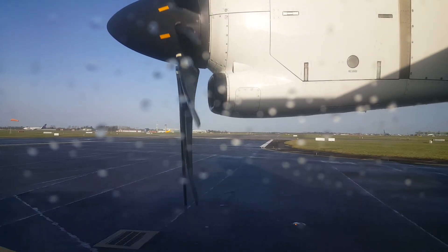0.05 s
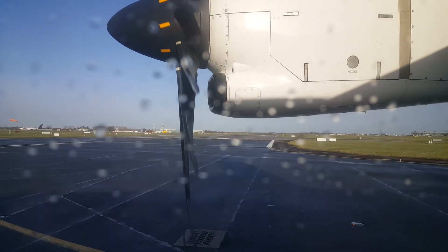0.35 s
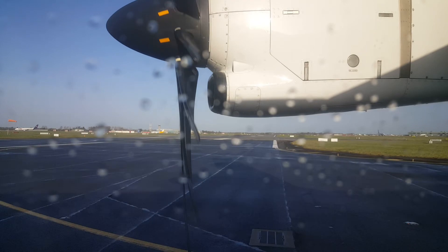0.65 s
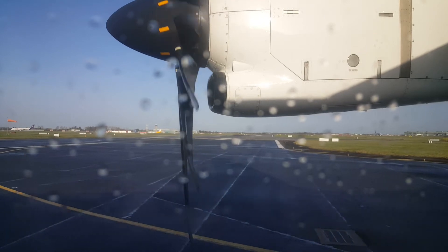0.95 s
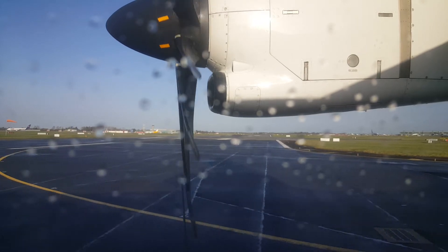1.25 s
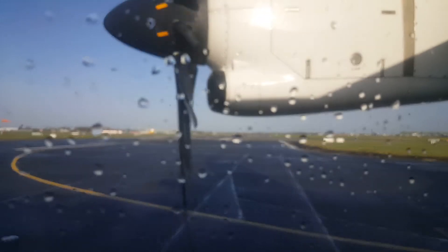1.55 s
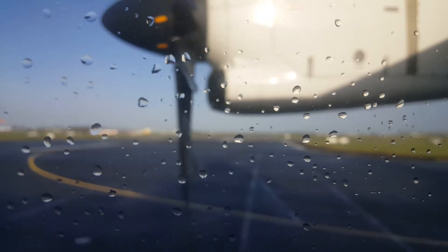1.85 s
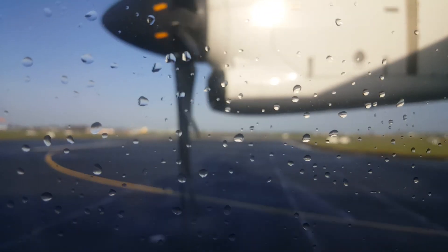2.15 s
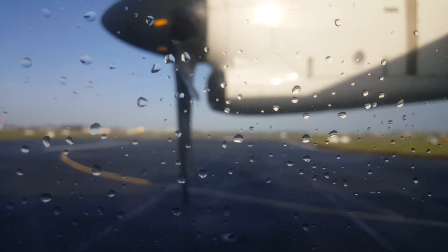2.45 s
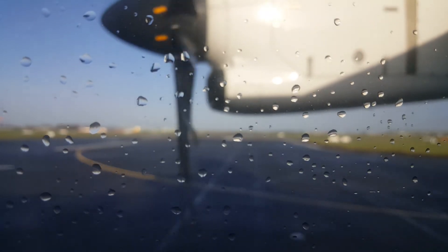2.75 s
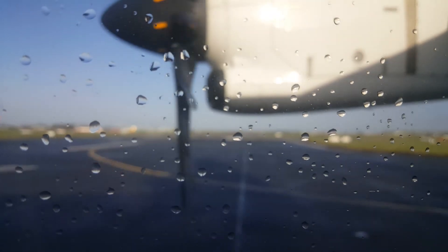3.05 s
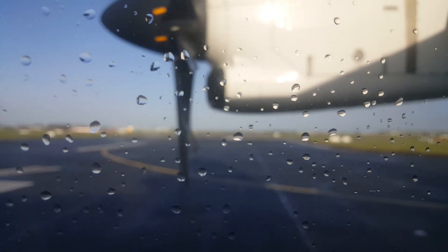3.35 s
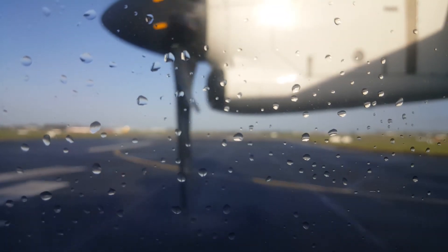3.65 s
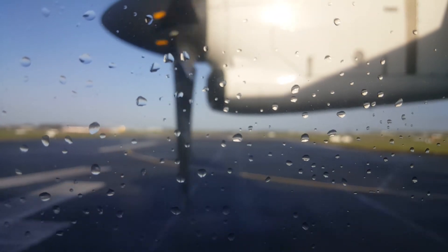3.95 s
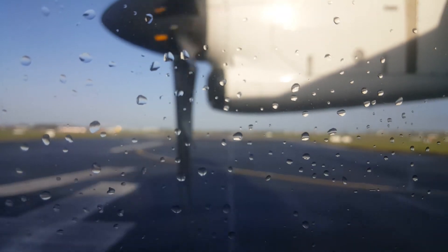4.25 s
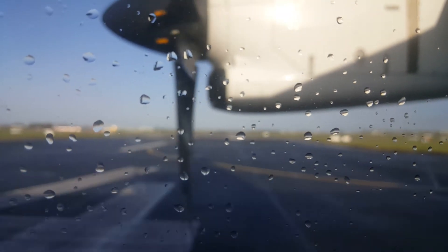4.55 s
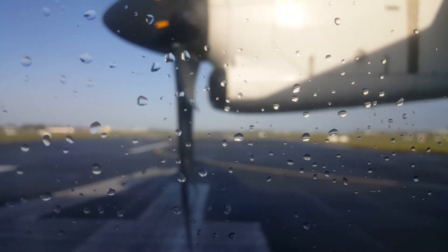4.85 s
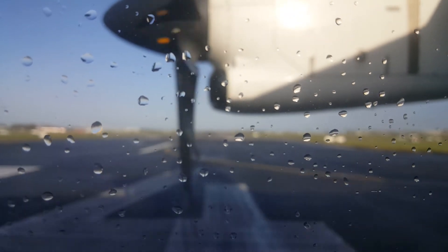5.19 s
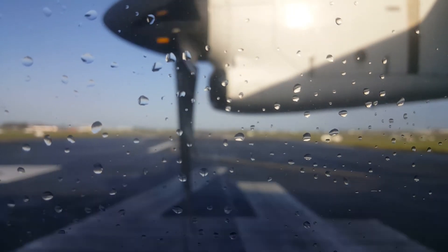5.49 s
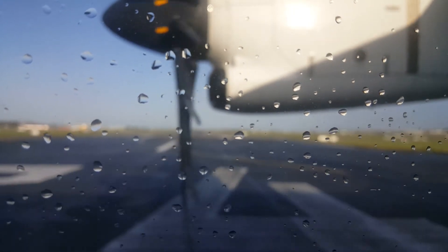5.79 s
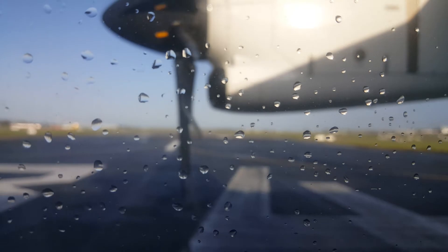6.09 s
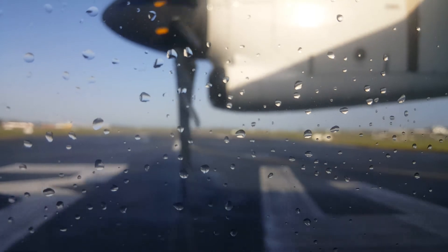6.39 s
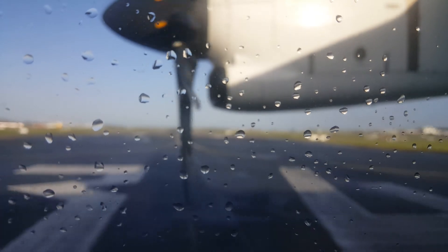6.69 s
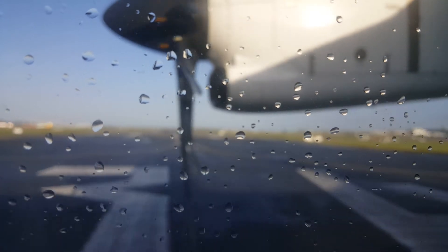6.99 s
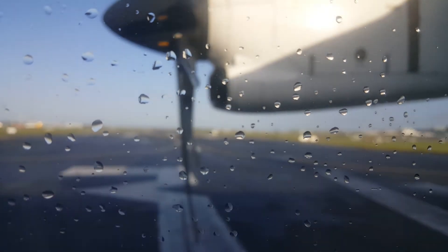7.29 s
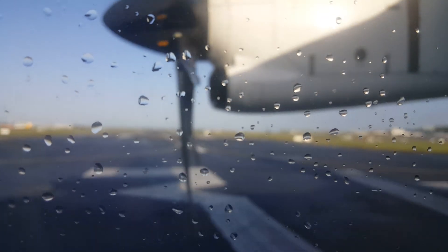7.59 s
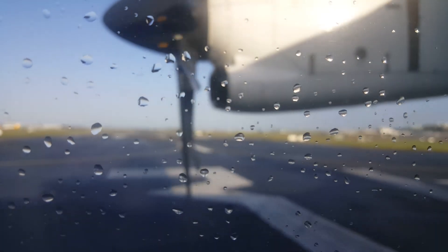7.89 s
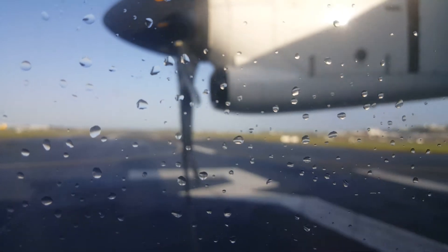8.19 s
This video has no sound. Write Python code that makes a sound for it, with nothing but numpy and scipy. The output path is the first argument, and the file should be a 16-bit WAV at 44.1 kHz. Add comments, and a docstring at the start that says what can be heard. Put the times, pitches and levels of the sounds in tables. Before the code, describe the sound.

A turboprop engine drones inside the cabin, booming over wheel bumps, before the propellers take load and buzz loudly.

```python
"""Inside a turboprop airliner turning onto the runway, heard from a window seat beside the propeller.
From the start, a throbbing engine drone fills the cabin over rumble, propeller wash, air hiss and a
thin turbine whine, while plastic trim panels tick. After four seconds the wheels bump over two pavement
joints, and the drone sags in pitch and booms. At six seconds the blades take load and start to buzz."""
import sys
import numpy as np
from scipy import signal
from scipy.fft import rfft, irfft
from scipy.io import wavfile
from scipy.ndimage import uniform_filter1d, minimum_filter1d

SR = 44100
rng = np.random.default_rng(int(sys.argv[2]) if len(sys.argv) > 2 else 0)


def transcribe(u):
    """Save the signal u as a 16-bit wav file named by the first command-line argument.

    u: samples, shape (n,) or (channels, n), limited to [-1, 1]; the rate is SR.
    q: integer samples, one column per channel.
    """
    v = np.clip(np.atleast_2d(u).T, -1, 1)
    q = np.round(v * 32767).astype(np.int16)
    wavfile.write(sys.argv[1], SR, q)


N = 362943
TIME, FREQ = np.arange(N) / SR, np.fft.rfftfreq(N, 1 / SR)

# Table levels are relative: the functions scale and offset them.
# The drone sags and booms as the aircraft lines up: time_s, pitch_hz, level_db, roughness (0-1)
DRONE_PATH = [(0, 129, -17, 0.7), (1.9, 131, -14.5, .45), (3.3, 129.5, -15.5, .4), (4.15, 128, -16, .45),
              (4.55, 123.5, -8.5, 0.3), (5.05, 122, -7.5, .2), (5.65, 125.5, -8.5, .2),
              (6.15, 131, -8, .22), (6.6, 131.5, -14.5, .45), (7.6, 132.5, -14.5, 0.1),
              (8.23, 129.5, -17, 0.2)]
# Brief swells and dips of the drone: middle_s, lift_db, length_s
DRONE_SWELLS = [(0.396, 2, 0.054), (1.605, 11, 0.11), (2.679, 5.5, 0.31), (3.461, 9, 0.1), (3.92, 7.5, .06),
                (4.128, -9.5, 0.063), (6.701, -7.5, 0.071), (6.837, 5.5, .08), (7.245, -10, 0.073),
                (7.492, 12, 0.044), (7.619, 6, .08)]
# Speed and buzz of the blades: time_s, blade_rate_hz, level_db
BLADE_PATH = [(0, 87, -43.5), (3.6, 81, -42), (5, 87, -47.5), (5.8, 84, -44.5), (6.2, 87, -29),
              (6.45, 84, -26), (6.75, 85, -19.5), (7.1, 87, -20), (7.5, 85.5, -22), (8.23, 85.8, -20)]
# The tones in the buzz: multiple (of the blade rate), near_propeller_db, far_propeller_db
BLADE_TONES = [(1, -13, -21), (2, -10.5, -7.5), (3, 1, -12), (4, -3.5, -13), (5, -8, -7), (6, -11, -15),
               (7, -13, -9.5), (8, -12.5, -13), (9, -17, -13), (10, -13.5, -28.5), (11, -21.5, -26),
               (12, -26, -26.5), (13, -21.5, -30.5), (14, -29.5, -33.5)]
# Colour of the airframe's rumble: frequency_hz, level_db
RUMBLE_COLOUR = [(4, -26.5), (15, -36.5), (27, -25.5), (38, -24.5), (52, -13.5), (70, -11), (100, -11),
                 (130, -5.5), (157, -13), (199, -11), (227, -10), (253, -19), (288, -14.5), (320, -21.5),
                 (380, -19.5), (470, -30.5), (610, -62.5), (1030, -120)]
# The rumble eases while the aircraft lines up: time_s, level_db
RUMBLE_PATH = [(0, -18), (4.8, -18), (5.15, -19.5), (6.7, -17), (8.23, -16.5)]
# Colour of the wash, the air thrown back by the propellers: frequency_hz, level_db
WASH_COLOUR = [(260, -32.5), (450, -3), (532, -5), (581, -2), (626, -5.5), (675, 0), (776, -6), (882, -4.5),
               (985, -5.5), (1210, -10), (1370, -11.5), (1500, -14.5), (1800, -16.5), (2340, -51),
               (3960, -120)]
# The wash eases through the turn and returns with the power: time_s, level_db
WASH_PATH = [(0, -28), (1.6, -30.5), (3.5, -29.5), (5.3, -33), (6.03, -31.5), (6.2, -27.5), (6.7, -24.5),
             (7.4, -26.5), (8.23, -26)]
# Colour of the air hiss: frequency_hz, level_db
HISS_COLOUR = [(1030, -34), (1750, -1), (1900, 0.5), (2550, -3.5), (2920, -9.5), (3770, -15.5),
               (3990, -16.5), (4170, -16), (4330, -18.5), (5010, -23), (7030, -27), (7780, -27.5),
               (10100, -40), (12700, -37.5), (15600, -43)]
# The hiss swells as power comes on: time_s, level_db
HISS_PATH = [(0, -41.5), (4.5, -41.5), (5.2, -43), (6.45, -40), (7.3, -42.5), (8.23, -42.3)]
# Wheels crossing pavement joints: middle_s, level_db, length_s
WHEEL_BUMPS = [(4.094, -27, .22), (4.777, -18.5, 0.2)]
# Ticks of the cabin trim: start_s, peak_db, tilt_db_per_octave, decay_s
TRIM_TICKS = [(1.578, -34, 0.5, .0015), (1.978, -27, -1, .0035), (2.174, -17.5, -5.5, 0.00058),
              (3.083, -28, -1, .002), (3.148, -31, -1, 0.0011), (4.145, -29, 0, .002),
              (4.5187, -33, 3, 0.0032), (4.528, -17, -4.5, 0.0012), (6.197, -29, -1, 0.0027),
              (6.4178, -32, -1, 0.0011), (6.535, -30, -2, 0.0028), (7.1705, -26.5, -5, 0.0015),
              (7.378, -31, -1, 0.0029), (7.4536, -31, 1, 0.0019), (7.944, -32, 1, 0.0029)]
# Colour of a tick: frequency_hz, level_db
TRIM_COLOUR = [(300, -38.5), (1500, -6.5), (2600, 3.5), (4300, 2), (5500, 0), (7000, -5), (8700, -6.5),
               (10200, -19.5), (11300, -15.5), (12800, -9), (15500, -15)]
# The whine fades and rises in the turn, then glides down under power: time_s, pitch_hz, level_db
WHINE_PATH = [(0, 4105, -58), (.9, 4130, -55.5), (2.5, 4143, -64.5), (3.15, 4140, -54.5),
              (3.8, 4135, -56.5), (4.7, 4130, -70), (5.9, 4420, -78), (6.7, 4300, -67), (7.5, 4175, -72),
              (7.73, 4140, -57), (8.23, 4110, -67)]
# Pitches boosted or weakened in the noise: cabin resonances, plus a thin high sheen from the
# microphone: frequency_hz, width_hz, lift_db
NOISE_PEAKS_AND_DIPS = [(55, 8.3, 3), (71.5, 5.7, -6), (84.4, 15, 7), (106, 8.2, -2.5), (176, 33, 4.5),
                        (199, 20, -5), (242, 14, 3.5), (620, 21, 4), (659, 7.1, 3.5), (998, 40, -7),
                        (1204, 14, -8.5), (1794, 150, -4.5), (1980, 120, 2.5), (12900, 400, 5)]
# How much the ears differ (side) against what they share (mid): frequency_hz, side_db
STEREO_WIDTH = [(30, -26.5), (60, -21.5), (110, -16), (200, -18.5), (380, -7.5), (700, -4), (1290, 3),
                (2380, -0.5), (4400, 0), (15000, 0)]
# How much louder the left ear is than the right: frequency_hz, left_db
STEREO_LEAN = [(60, -0.5), (110, 3), (200, 1), (380, -2), (700, 2), (1290, 3.5), (2380, 4), (4400, 4),
               (8120, 2.5), (15000, -4)]


def engine_drone(gain_db=-1.5, spread_hz=11, right_db=0.87, evenness=0.4):
    """One strong engine tone that swells now and then; turbulence shakes its phase and strength."""
    hz, db, rough = curves(DRONE_PATH)
    swell = amp(sum(lift_db * bell_curve(TIME - s, length) for s, lift_db, length in DRONE_SWELLS))
    rough = np.clip(rough / swell, 0, 1)  # steadier while it swells
    shake = (1 - rough + rough * flutter(spread_hz)) / np.hypot(1 - rough, rough)
    shake /= (abs(shake) + 0.053) ** evenness  # partly evens out the strength
    tone = unit((spin(hz) * shake).real) * amp(db + gain_db) * swell
    return np.array([tone, tone * amp(right_db)])


def propellers(rough=.55, smear_hz=7, lag_hz=.7):
    """The passing blades of two propellers buzz slightly out of step; gusts smear their tones."""
    hz, db = curves(BLADE_PATH)
    near, far = spin(hz), spin(hz - lag_hz)
    out = np.zeros((2, N))
    for multiple, near_db, far_db in BLADE_TONES:
        for rotor, tone_db in (near, near_db), (far, far_db):
            steady = (1 - rough) * np.exp(2j * np.pi * rng.random())
            tone = unit(steady + rough * flutter(smear_hz)) * rotor ** multiple
            side = (-1) ** multiple * tone.imag  # a quarter cycle off, so the ears differ in phase
            out += amp(tone_db) * ears(tone.real, side, multiple * hz.mean())
    return unit(out) * amp(db)


def blade_load():
    """How hard the blades work, from 0 to 1."""
    _, db = curves(BLADE_PATH)
    return amp(db - db.max())


def roar(rumble_db=3, wash_db=-1, gust_db=0.93, gust_hz=12, full_load_db=-4):
    """Airframe rumble, gusty wash and hiss; under load some wash gives way to the blade buzz."""
    (rumble_level,), (wash_level,) = curves(RUMBLE_PATH), curves(WASH_PATH)
    (hiss_level,) = curves(HISS_PATH)
    gusts = gust_db * unit(flutter(gust_hz).real)
    rumble = cabin_noise(RUMBLE_COLOUR) * amp(rumble_level + rumble_db)
    wash = cabin_noise(WASH_COLOUR) * amp(wash_level + wash_db + gusts + full_load_db * blade_load())
    hiss = cabin_noise(HISS_COLOUR) * amp(hiss_level + gusts)
    return rumble + wash + hiss


def cabin_noise(colour, ripple_db=1.27):
    """The noise of swirling air, shaped by cabin resonances and the microphone's thin high sheen."""
    lift_db = sum(db / (1 + (2 * (FREQ - hz) / width) ** 2) for hz, width, db in NOISE_PEAKS_AND_DIPS)
    # nearby walls put many small peaks and dips in the treble
    ripple = unit(uniform_filter1d(rng.standard_normal((2, len(FREQ))), size=500, axis=1))
    ripple *= FREQ / (FREQ + 1500)
    shape = amp(look_up(colour, FREQ) + lift_db + ripple_db * ripple)
    mid, side = rfft(rng.standard_normal((2, N))) * shape
    return irfft(ears(mid, side, FREQ), N) / np.std(irfft(mid, N))


def wheel_bumps(low_hz=31, high_hz=43, high_db=-3):
    """A wheel meets a joint, and two deep airframe vibrations swell and fade."""
    out = np.zeros((2, N))
    for s, db, length in WHEEL_BUMPS:
        t = TIME - s
        shake = np.cos(2 * np.pi * low_hz * t) + amp(high_db) * np.sin(2 * np.pi * high_hz * t)
        out += amp(db) * bell_curve(t, length) * shake
    return out


def trim_ticks(gain_db=1, faint_db=-43, spread_db=2, faint_count=30, shaken_db=-40):
    """Clear ticks, faint ones at random, and a flurry as the hardest bump shakes the trim."""
    out = np.zeros((2, N))
    for s, peak_db, tilt_db, decay_s in TRIM_TICKS:
        add(out, s, panel_snap(peak_db + gain_db, tilt_db, decay_s))
    for place, size in rng.random((faint_count, 2)):
        peak_db = faint_db + spread_db * (2 * size - 1)
        add(out, place * TIME[-1], panel_snap(peak_db, tilt_db=1.5, decay_s=.002))
    for delay in rng.uniform(-.04, 0.032, size=6):
        add(out, WHEEL_BUMPS[-1][0] + delay, panel_snap(shaken_db, tilt_db=0, decay_s=.004))
    return out


def panel_snap(peak_db, tilt_db, decay_s, rise_s=0.00046, tail_db=-22, tail_s=0.0073):
    """A stiff plastic panel slips: a dry burst with a short tail of echoes from nearby walls."""
    t = np.arange(2048) / SR
    hz = np.fft.rfftfreq(len(t), 1 / SR)
    attack = 1 - np.exp(-t / rise_s)
    fade = np.exp(-t / decay_s) + amp(tail_db) * np.exp(-t / tail_s)
    colour = amp(look_up(TRIM_COLOUR, hz) + tilt_db * np.log2(np.maximum(hz, 2000)))
    burst = irfft(rfft(rng.standard_normal((2, len(t))) * attack * fade) * colour)
    return burst / abs(burst).max() * amp(peak_db)


def turbine_whine(hz, db, spread_hz, octave_db, wander_hz=13, fade_db=3):
    """A compressor tone and its octave wander in pitch and fade in patches, differently at each ear."""
    rotor = spin(hz + wander_hz * unit(flutter(6).real))
    octave = amp(octave_db) * rotor ** 2
    tones = [rotor * flutter(spread_hz) + octave * flutter(2 * spread_hz) for _ in range(2)]
    patches = amp(fade_db * unit(flutter(3.3).real))
    return unit(np.real(tones) * patches) * amp(db)


def ears(mid, side, hz):
    """Bass fills the cabin evenly; treble comes from all around, more from the window side."""
    side = side * amp(look_up(STEREO_WIDTH, hz))
    lean = amp(look_up(STEREO_LEAN, hz) / 2)
    return np.array([(mid + side) * lean, (mid - side) / lean])


def flutter(width_hz):
    """A slow random wobble of strength and phase that spreads a tone over width_hz."""
    step = 64  # samples between wobble points
    count = N // step + 2
    hz = np.fft.fftfreq(count, step / SR)
    noise = rng.standard_normal((count, 2)) @ [1, 1j]
    wobble = np.fft.ifft(noise / (1 + (hz / width_hz) ** 2))
    return unit(np.interp(np.arange(N), np.arange(count) * step, wobble))


def spin(hz):
    """A point circling hz times a second; its real part is a pure tone."""
    return np.exp(2j * np.pi * np.cumsum(hz) / SR)


def bell_curve(t, length_s):
    """A smooth rise and fall around t = 0."""
    return np.exp(-(2 * t / length_s) ** 2)


def curves(rows):
    """Turns each column after time_s into one value per sample."""
    times, *columns = np.transpose(rows)
    return [np.interp(TIME, times, column) for column in columns]


def look_up(rows, hz):
    """Reads a frequency table at hz, along a logarithmic axis."""
    frequencies, values = np.transpose(rows)
    return np.interp(np.log(hz + 1), np.log(frequencies + 1), values)


def add(mix, start_s, sound):
    """Mixes a stereo sound in at start_s."""
    part = mix[:, max(round(start_s * SR), 0):][:, :sound.shape[1]]
    part += sound[:, :part.shape[1]]


def amp(db):
    """Turns decibels into a gain."""
    return 10 ** (np.asarray(db) / 20)


def unit(x):
    """Scales a signal to an average strength (rms) of 1."""
    return x / np.sqrt(np.mean(abs(x) ** 2) + 1e-20)


def scene(whine_gain_db=2, high_whine_hz=4785, high_idle_db=-73, high_load_db=9):
    """Everything heard at the seat; a second, higher whine grows with the load on the blades."""
    hz, db = curves(WHINE_PATH)
    whine = turbine_whine(hz, db + whine_gain_db, spread_hz=15, octave_db=-19.5)
    high_db = high_idle_db + high_load_db * blade_load()
    high_whine = turbine_whine(high_whine_hz, high_db, spread_hz=22, octave_db=-29)
    return engine_drone() + propellers() + roar() + wheel_bumps() + trim_ticks() + whine + high_whine


def record(dry):
    """Gently holds down the highest peaks, softens both ends and cuts the very top of the treble."""
    ceiling, cutoff_hz = .92, 15780
    gain = np.minimum(1, ceiling / (abs(dry).max(0) + 1e-9))
    held_gain = minimum_filter1d(gain, size=900)
    smooth_gain = uniform_filter1d(uniform_filter1d(held_gain, size=450), size=450)
    ends = signal.windows.tukey(N, .001)
    low_pass = signal.firwin(511, cutoff_hz, window=("kaiser", 9), fs=SR)
    return signal.oaconvolve(dry * smooth_gain * ends, low_pass[None], "same")


dry = scene()
out = record(dry)
transcribe(out)
```